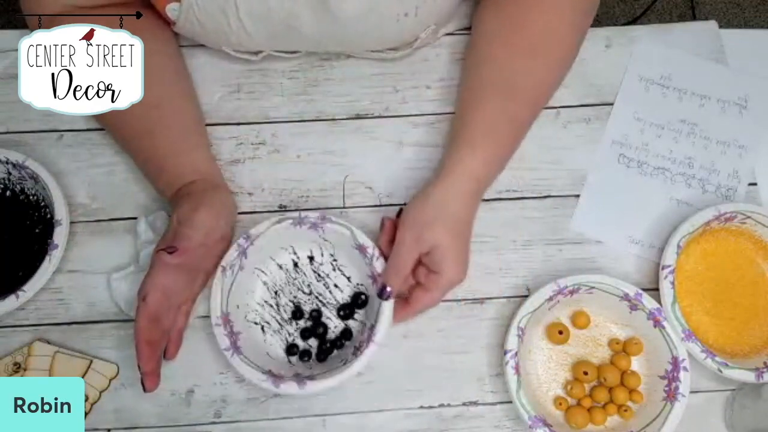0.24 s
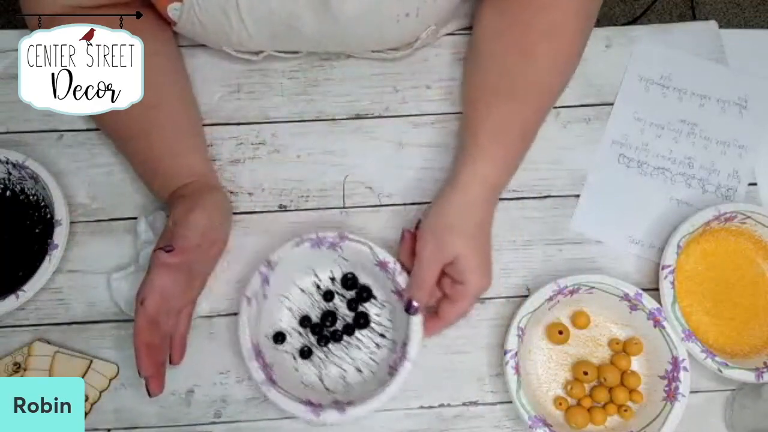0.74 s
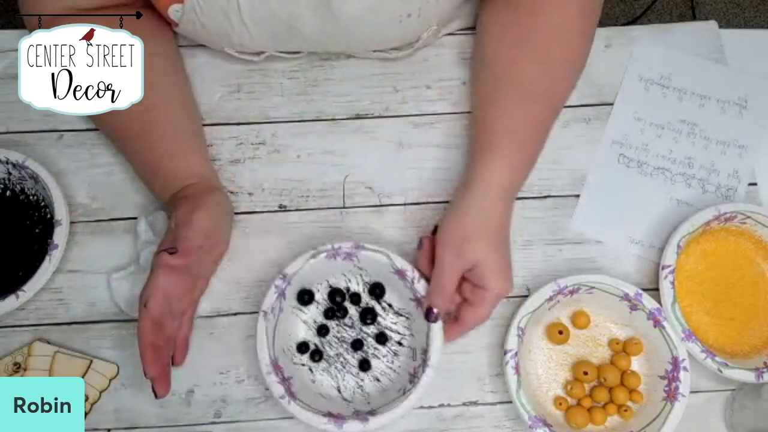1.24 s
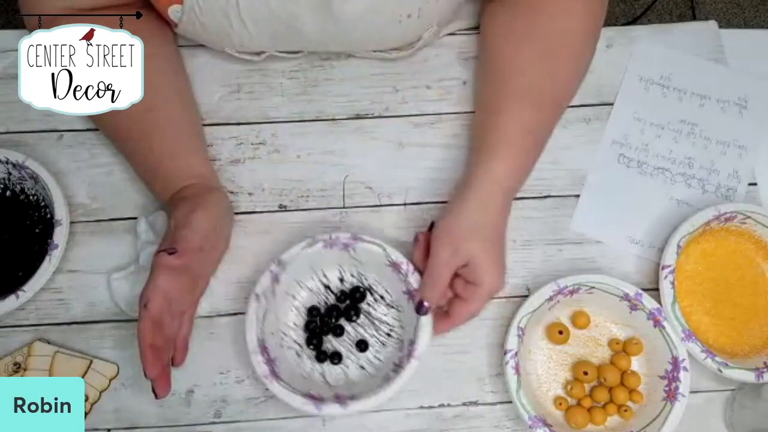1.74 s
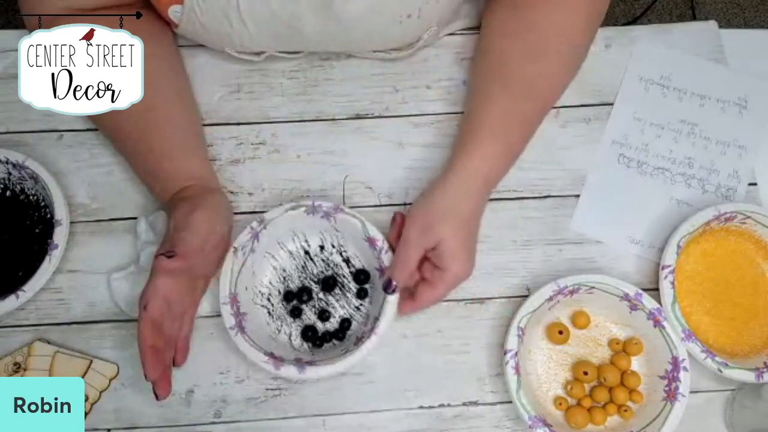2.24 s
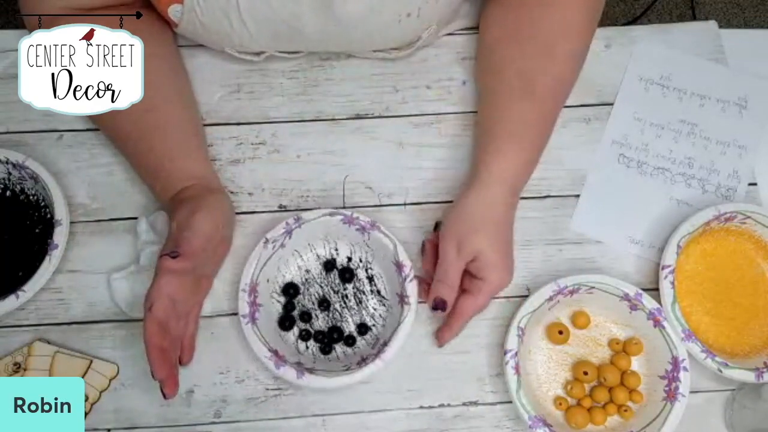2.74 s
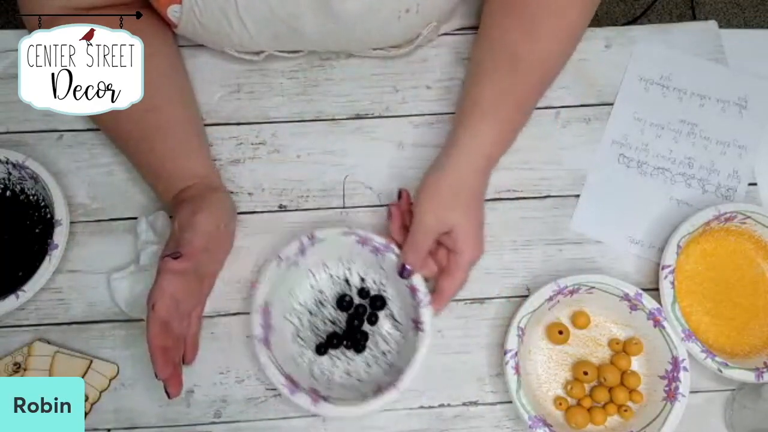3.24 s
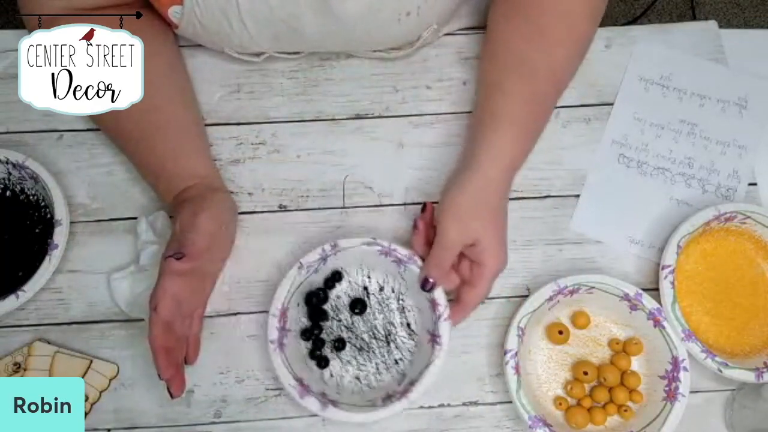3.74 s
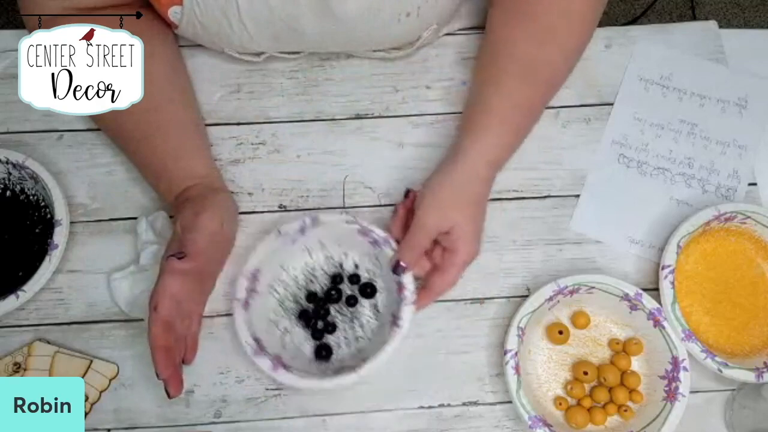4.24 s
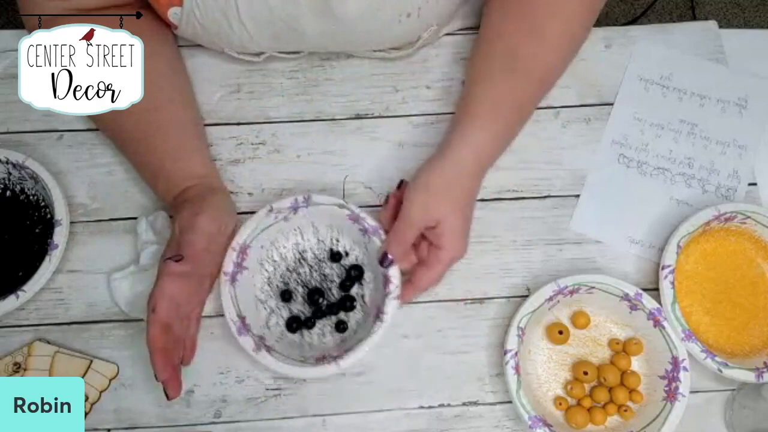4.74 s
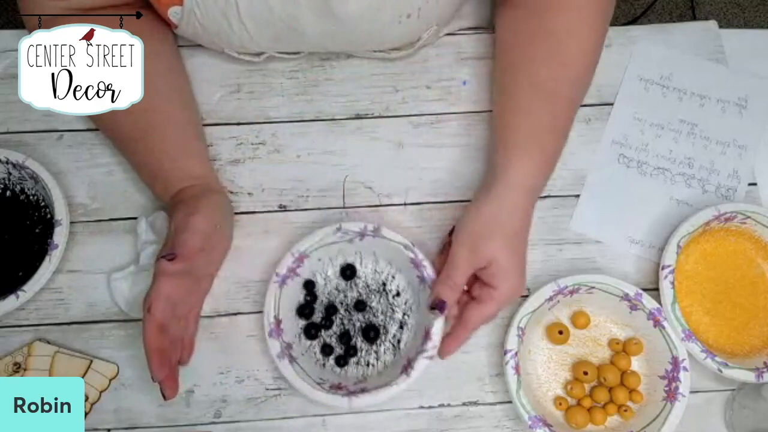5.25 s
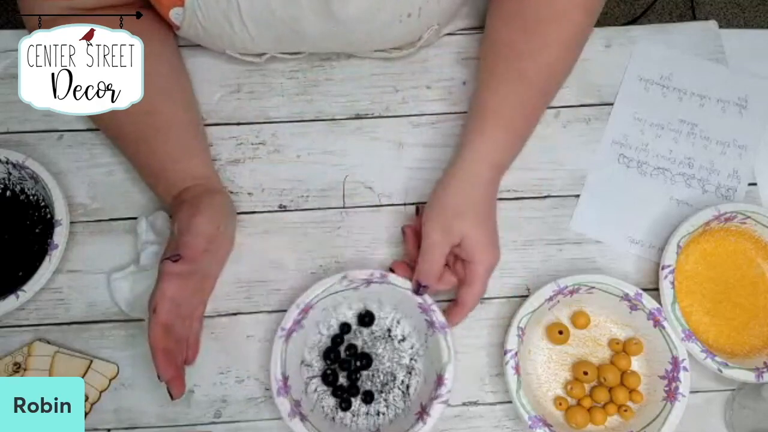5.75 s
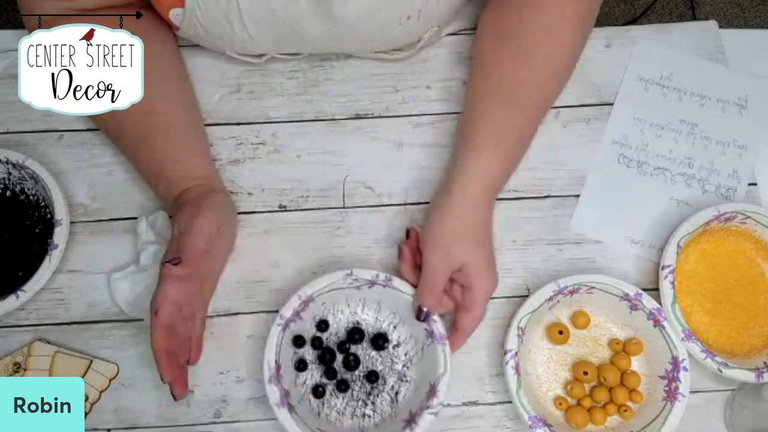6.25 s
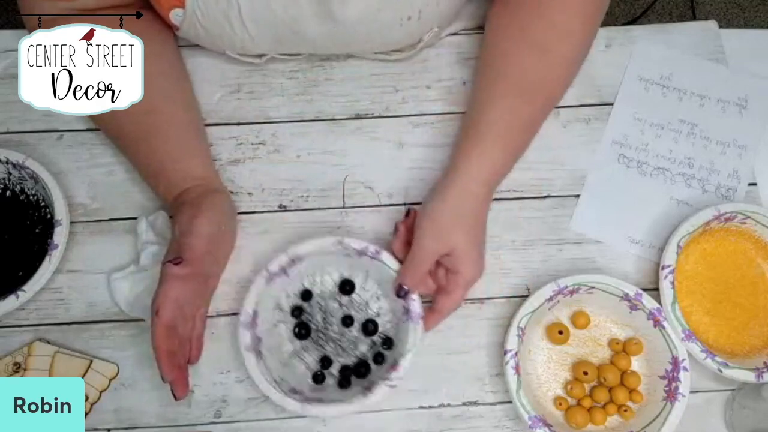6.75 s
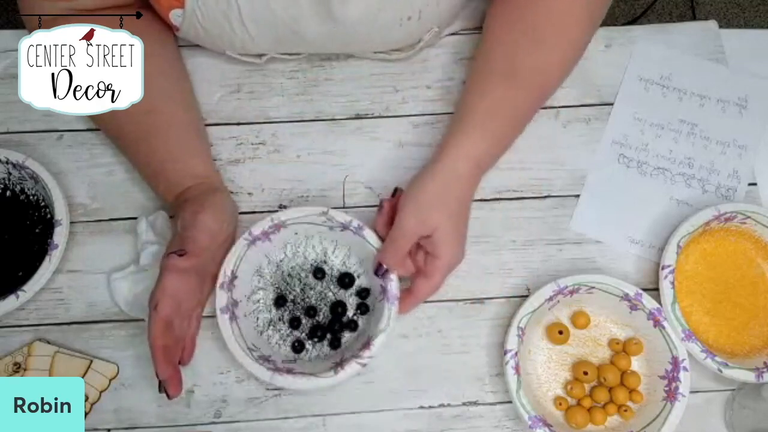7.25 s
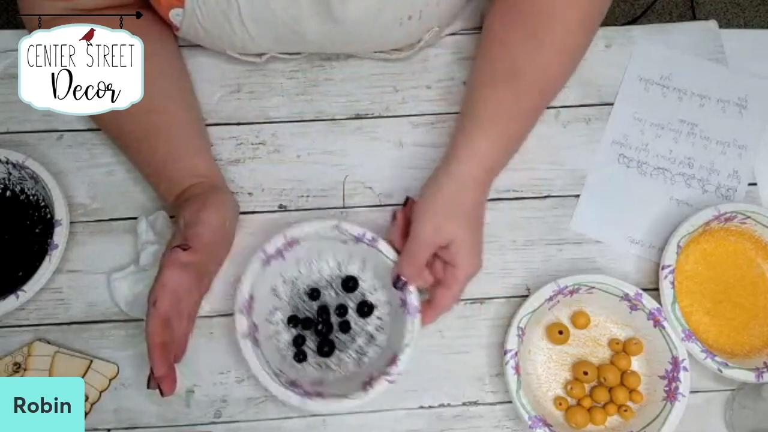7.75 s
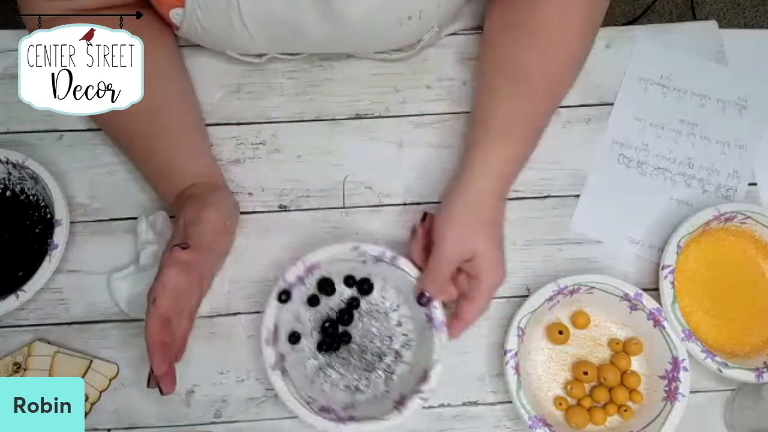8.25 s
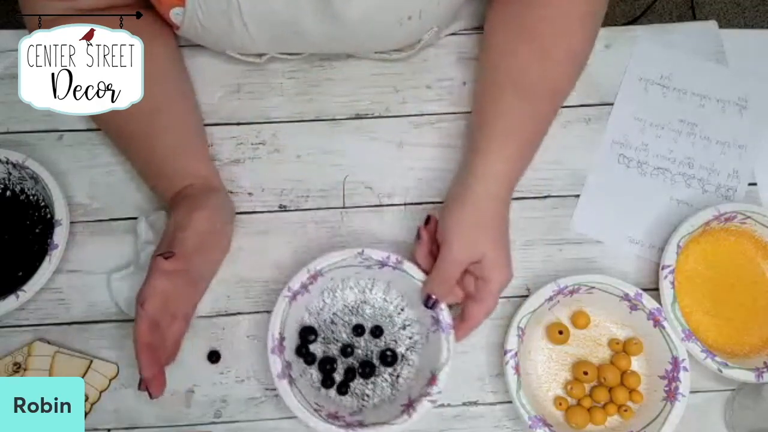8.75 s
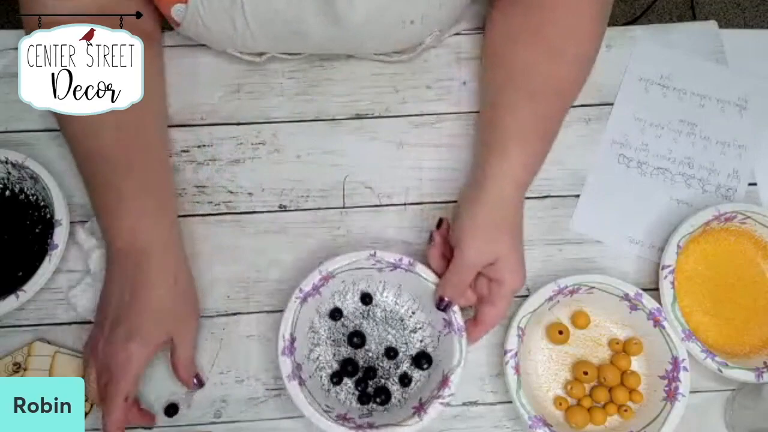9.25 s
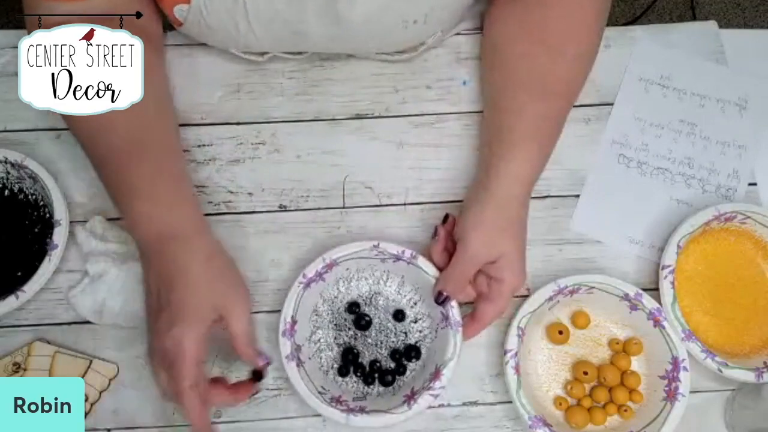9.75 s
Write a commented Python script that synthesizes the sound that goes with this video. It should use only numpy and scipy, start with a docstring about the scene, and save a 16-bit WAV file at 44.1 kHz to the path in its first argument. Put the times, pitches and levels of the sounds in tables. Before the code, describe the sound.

Small painted wooden beads roll and knock inside a powdered paper bowl, close to a single microphone in a small, dry room with a barely audible hush. From 0 to 0.9 s the rattle is bright and dense; lighter shakes follow, with sharper knocks near 1.5 s and a strong cluster around 1.9-2.2 s. It thins out and pauses at about 2.8 s. From 3.1 to 5.3 s the beads are shaken again, with firm clacks near 3.8 and 4.8 s. They almost rest until 6 s, with only faint ticks and soft low thumps of the bowl's bottom. Rolling resumes at 6.1 s, and from 7 to 8.6 s knocks crowd together, louder and duller, the hardest near 8.45 s. A few last clacks and a brief scrape end at about 9.2 s, leaving quiet.

```python
"""0-2.8 s: a dozen painted wooden beads, shaken in bursts in a powdered paper bowl on a craft table, roll
and scrape (dense ringing grains) and knock (rough force through a resonance); faint hush throughout.
From 0.8 s the bowl's bottom thumps softly now and then (juddering low sines).
3.1-5.3 s: shaken again, then near rest until about 6 s; the knocks crowd and grow louder and duller
at 7-8.6 s and end at 9.2 s. Bowl modes and a small room ring after the contacts; a single microphone hears it."""
import sys
import numpy as np
from scipy import signal
from scipy.fft import rfft, irfft
from scipy.io import wavfile
from scipy.ndimage import uniform_filter1d

SR = 44100
rng = np.random.default_rng(int(sys.argv[2]) if len(sys.argv) > 2 else 0)


def digitize_waveform(pressure):
    """Quantize a signal to 16-bit integers and store it at the path in sys.argv[1].

    Rows of a 2-D input are taken as channels; values are limited to [-1, 1].
    """
    field = np.atleast_2d(pressure).T
    bounded = np.clip(field, -1, 1)
    quanta = np.round(bounded * 32767).astype(np.int16)
    wavfile.write(sys.argv[1], SR, quanta)


N = 440559

# quiet background spectrum: (frequency [Hz], relative density [dB per Hz])
HUSH_SPECTRUM = [(20, 6), (200, -8.5), (600, -23.5), (15000, -33.5)]
# bowl kept moving, a few beads rolling:
# (start [s], length [s], level before bowl and room [dB], relative brightness [dB per octave])
SPELLS = [(0, 0.54, -41.5, 3), (0.59, 0.27, -45, 5), (1.049, 0.73, -47.5, 1.5), (1.85, 0.76, -48, 6.5),
          (3.111, 0.36, -44.5, 4.5), (3.532, 0.93, -43, 2.5), (4.53, 0.74, -43, 4.5),
          (5.858, 0.035, -59.0, 10), (6.102, 0.23, -45, 5), (6.372, 0.93, -40, 1.5), (7.37, 0.9, -44, 1.5),
          (8.334, 0.46, -46, 1), (8.922, 0.31, -43.5, -2)]
# shakes that send the whole heap across the paper:
# (start [s], length [s], level before bowl and room [dB], relative brightness [dB per octave])
SHAKES = [(0.038, 0.13, -31.5, 1.5), (0.269, 0.23, -31.0, -1.5), (0.592, 0.037, -35, 4),
          (0.943, 0.031, -31, 0), (1.049, 0.043, -31.5, 2.5), (1.174, 0.073, -32.5, 3),
          (1.271, 0.045, -32, 1.5), (1.409, 0.028, -33, 5), (1.486, 0.033, -30, 1.5),
          (1.623, 0.067, -34.5, 2.5), (1.744, 0.021, -29.0, 2.5), (1.851, 0.05, -26, 1),
          (1.937, 0.13, -34.5, -1.5), (2.186, 0.034, -27, 2.5), (2.255, 0.049, -34.5, 1.5),
          (3.197, 0.068, -34, 4.5), (3.553, 0.024, -31.5, -3.5), (3.618, 0.058, -35, 7.5),
          (3.777, 0.03, -32.5, 0.0), (3.896, 0.038, -24.5, 2), (3.987, 0.033, -23, -0.5),
          (4.089, 0.016, -32, -1.5), (4.17, 0.081, -37, 0), (4.309, 0.055, -35.5, 6),
          (4.519, 0.14, -32.0, -0.5), (4.854, 0.13, -34, 0.5), (5.155, 0.014, -31.0, 3.5),
          (6.183, 0.039, -37.5, 7), (6.276, 0.033, -34, -0.5), (6.389, 0.12, -34, 2.5),
          (6.525, 0.074, -28, 3.5), (6.638, 0.03, -28.5, 3.5), (6.726, 0.033, -32.5, 4),
          (6.828, 0.1, -35, -0.5), (6.932, 0.047, -26, -4), (7.019, 0.081, -27.0, -1.5),
          (7.191, 0.041, -30, 0), (7.28, 0.032, -27.5, -4), (7.374, 0.044, -21.0, -3),
          (7.667, 0.11, -28.5, -4.5), (7.847, 0.028, -24, -2.5), (7.947, 0.04, -23.5, 0),
          (8.042, 0.028, -30.5, -4.5), (8.12, 0.018, -34, 4.5), (8.163, 0.07, -25, 1.5),
          (8.381, 0.045, -27.5, -2), (8.636, 0.022, -32.5, 2.5), (8.954, 0.094, -34.5, 2),
          (9.124, 0.02, -27, -0.5)]
# colour of rolling: (frequency [Hz], relative gain [dB])
ROLL_COLOUR = [(30, -35), (90, -27.5), (130, -22.5), (290, -11.5), (600, 0.5), (1450, 1.5), (2050, -6),
               (3100, -6), (3800, -8.5), (4800, -18), (5800, -20), (7000, -28.5), (8500, -51.5),
               (15000, -70.5)]
# modes of the bowl: (frequency [Hz], resonance gain before the common ring_db [dB], t60 [s])
BOWL_MODES = [(348, 2.5, 0.056), (434.7, -0.5, .06), (640.6, -1, .08), (696, -20.5, 0.18), (926, -1, 0.091),
              (1023, -8, 0.038), (1290, -9.5, 0.057), (2331, 3, 0.02), (2590, -12, 0.081),
              (3130, -2, 0.026)]
# decay of the room: (frequency [Hz], t60 [s])
ROOM_T60 = [(200, 0.074), (8000, 0.069)]
# knocks that stand out of the rattle:
# (time [s], level before bowl and room [dB], ringing pitch [Hz], hardness as treble tilt [dB per octave])
KNOCKS = [(0.1953, -17, 2370, 6.5), (0.342, -19.5, 1900, 3.5), (0.3894, -21, 3120, 8),
          (0.422, -16.5, 2820, -2), (0.457, -18.5, 4130, -2), (0.4978, -21, 1840, -8),
          (0.5227, -22, 1720, -1.5), (0.584, -21.5, 5800, -2), (0.6129, -22.5, 1090, 2.5),
          (0.7544, -21, 3370, 0.5), (0.7939, -25.5, 3280, 7.5), (0.8513, -24.5, 3530, -1.5),
          (1.076, -25, 2180, -3), (1.1585, -26.5, 1720, 3), (1.1985, -25, 620, 3.5), (1.2367, -25, 3400, 2),
          (1.3197, -25, 640, -1), (1.477, -11.5, 795, 0.5), (1.5655, -23.5, 5600, -3),
          (1.6374, -26, 2950, -3), (1.664, -26, 3200, -3), (1.8666, -14.5, 1245, -1),
          (1.8975, -14.5, 1980, -2), (1.975, -19, 1290, 0.5), (2, -16.5, 2550, -4.5),
          (2.0481, -11.5, 1210, 5), (2.0915, -18.5, 1050, -3.5), (2.143, -29.5, 4960, 4),
          (2.1758, -20, 3090, 5), (2.19, -14, 3130, 3), (2.2, -21.5, 630, -6), (2.2203, -21.5, 640, -1),
          (2.2758, -21, 2760, 0.5), (2.4157, -26.5, 4080, 2), (2.457, -26.5, 2860, 4.5),
          (2.4996, -24, 3140, 1), (2.6153, -29.5, 3870, 1), (2.6963, -31.5, 4020, -1.5),
          (2.7835, -34, 1990, 2), (3.1266, -32.5, 910, 1), (3.2145, -32, 650, 8.5),
          (3.2577, -24.5, 1030, 2.5), (3.3454, -29.5, 655, 12.5), (3.3846, -26, 3200, 9),
          (3.5638, -29.5, 650, -1), (3.701, -15, 925, 2), (3.809, -11.5, 1270, -1.5),
          (3.933, -22.5, 3740, 7.5), (3.9456, -18, 1800, 4.5), (3.9842, -20, 5800, -1.5),
          (4.0502, -20, 1360, 1), (4.0851, -23.5, 1920, 0), (4.143, -26.5, 1700, -1.5),
          (4.1724, -28.5, 3300, 2), (4.2519, -28, 2840, -0.5), (4.2053, -22, 1370, -2.5),
          (4.3433, -21.5, 5000, -3), (4.4367, -23.5, 3660, -1.5), (4.5387, -22, 2970, 0),
          (4.578, -16, 1270, 6.5), (4.6322, -21, 1700, 2), (4.7716, -13, 980, 5.5), (4.8627, -25, 695, 2),
          (4.9072, -19, 627, 2.5), (4.961, -22, 800, -4.5), (5.0757, -19.5, 1530, -1),
          (5.1438, -24, 1050, -6), (5.1596, -17.5, 3220, -2.5), (5.1966, -24, 1680, 1.5),
          (5.257, -22, 1030, -4.5), (5.3634, -36, 2860, -1), (5.546, -65, 5900, 11),
          (5.742, -50.5, 1255, 12.5), (5.796, -51, 880, 3), (6.087, -27.5, 1210, 2),
          (6.2699, -28.5, 2470, -0.5), (6.53, -18.5, 4300, -1.5), (6.7275, -21, 3180, -0.5),
          (6.839, -26.5, 3160, 1), (6.9453, -20, 920, 6), (7.0806, -11.5, 1070, 2),
          (7.1595, -22.5, 1320, -0.5), (7.196, -17, 2400, -0.5), (7.2073, -9.5, 2610, 0),
          (7.2903, -12.5, 1630, 6.5), (7.4074, -11.5, 1070, -0.5), (7.529, -14.5, 3500, -3),
          (7.5896, -16.5, 1680, -7), (7.638, -12, 1660, -4), (7.69, -15.5, 1380, -8),
          (7.7407, -11, 3440, -1), (7.758, -15, 1880, -0.5), (7.8209, -20, 1860, -0.5),
          (7.8589, -16, 1930, -5), (7.9445, -18, 2890, 0.5), (8.047, -13, 1740, -2),
          (8.0756, -15.5, 1230, -1), (8.195, -11, 3720, -1.5), (8.27, -17.5, 1350, -5),
          (8.3293, -10.5, 1340, -0.5), (8.3382, -17.5, 1310, -2), (8.3875, -18, 1040, -5),
          (8.4505, -7, 1590, 1.5), (8.5353, -13, 2120, -3.5), (8.575, -26, 3800, -1),
          (8.7265, -16, 1340, 5.5), (8.843, -50.5, 1080, -10.5), (9.0013, -24, 6030, 2),
          (9.1737, -24.5, 1340, -4), (9.2298, -20.5, 1235, -3)]
# colour of a knock: (frequency [Hz], relative gain [dB])
KNOCK_COLOUR = [(30, -43), (100, -33.5), (270, -26), (450, -6.5), (650, -2), (1060, -2), (1450, 7.5),
                (2050, -8), (2600, -3), (3400, -8.5), (4700, -21.5), (5900, -20.5), (7000, -36),
                (8500, -71)]
# bowl bottom flexing against the table: (time [s], swell peak [dB], mean pitch [Hz], rise time [s])
THUMPS = [(0.841, -58, 149, 0.0061), (2.283, -43.5, 214, 0.013), (3.12, -49.5, 186, 0.017),
          (3.332, -49, 226, 0.031), (3.637, -43, 192, 0.018), (4.099, -49, 190, 0.014),
          (4.597, -40, 304, 0.019), (4.861, -45, 204, 0.019), (4.956, -43.5, 206, 0.013),
          (5.469, -41, 208, 0.0086), (5.543, -57, 189, 0.01), (5.852, -42.5, 220, 0.014),
          (6.076, -50, 182, 0.026), (6.737, -35, 320, 0.011), (8.636, -35, 195, 0.011)]

HUSH_RMS_DB = -82
BAND_LIMIT_HZ = 15500
KERNEL_SAMPLES = 2048
KERNEL_HZ = np.fft.rfftfreq(KERNEL_SAMPLES, 1 / SR)
KERNEL_T_S = np.arange(KERNEL_SAMPLES) / SR
TRAVEL_S = .004  # mean travel time of the bending waves
TILT_PIVOT_HZ = 1500
START_DB_PER_S, SETTLE_DB_PER_S = 1299.5, 749.5
# beads jostled by a knock: level against the knock, delay, length
JOSTLE_DB, JOSTLE_AFTER_S, JOSTLE_S = -15.5, .004, .005
# candidate light taps: rate, level against the rolling, scatter to either side
TAPS_PER_S, TAP_DB, TAP_SPREAD_DB = 20, 4, 1.5


def gain_of(db):
    """Decibels to amplitude."""
    return 10 ** (np.asarray(db) / 20)


def evened(x):
    """Scales to rms 1."""
    return x / np.sqrt(np.mean(x ** 2, axis=-1, keepdims=True) + 1e-20)


def read(points, hz):
    """Reads a table along a log-frequency axis."""
    point_hz, value = np.transpose(points)
    return np.interp(np.log(hz + 1), np.log(point_hz + 1), value)


def add(mix, start_s, sound):
    """Mixes a sound in at start_s."""
    part = mix[max(round(start_s * SR), 0):][:len(sound)]
    part += sound[:len(part)]


def causal(db):
    """Minimum-phase responses with these gains: they ring only after the blow."""
    log_gain = np.log(gain_of(np.concatenate([db, db[:, -2:0:-1]], axis=1)))
    return np.exp(np.conj(signal.hilbert(log_gain, axis=1)))[:, :len(KERNEL_HZ)]


def ring(hz, sharpness, lift_db):
    """Resonance of the struck spot, as a bump in dB."""
    ratio = (KERNEL_HZ + 1) / hz
    return 10 * np.log10(1 + gain_of(lift_db) ** 2 / (1 + (sharpness * (ratio - 1 / ratio)) ** 2))


def ripple(count, width_hz):
    """Smooth, bounded random curves over frequency: every spot of the bowl answers in its own way."""
    lag = np.fft.rfftfreq(KERNEL_SAMPLES, SR / KERNEL_SAMPLES)
    reach = np.exp(-.5 * (lag * width_hz) ** 2)
    curves = evened(irfft(rfft(rng.standard_normal((count, KERNEL_SAMPLES))) * reach))
    return evened(np.tanh(curves))[:, :len(KERNEL_HZ)]


def contact(db, uneven_db, uneven_hz, smear_s, smear_hz):
    """Responses of struck spots: uneven peaks, and bending waves that reach the air at unequal times."""
    delay_s = TRAVEL_S + smear_s * ripple(len(db), smear_hz)
    dispersion = np.exp(-2j * np.pi * np.cumsum(delay_s, axis=1) * SR / KERNEL_SAMPLES)
    uneven = causal(db + uneven_db * ripple(len(db), uneven_hz))
    return irfft(uneven * dispersion) * signal.windows.tukey(KERNEL_SAMPLES, .1)


def hush():
    """Very faint steady background: noise shaped by its spectrum."""
    spectrum = rfft(rng.standard_normal(N)) * gain_of(read(HUSH_SPECTRUM, np.fft.rfftfreq(N, 1 / SR)))
    return gain_of(HUSH_RMS_DB) * evened(irfft(spectrum, N))


def motion():
    """Level and brightness of the moving beads: pushes start, hold and settle; the strongest leads."""
    t = np.arange(0, N / SR, .001)
    jostles = [(s + JOSTLE_AFTER_S, JOSTLE_S, db + JOSTLE_DB, hardness) for s, db, hz, hardness in KNOCKS]
    start, length, db, brightness = np.vstack([SPELLS, SHAKES, jostles]).T[:, :, None]
    rise_db = START_DB_PER_S * np.maximum(start - t, 0)
    settle_db = SETTLE_DB_PER_S * np.maximum(t - start - length, 0)
    pushes_db = db - rise_db - settle_db
    leading_brightness = brightness[pushes_db.argmax(axis=0), 0]
    sample_s = np.arange(N) / SR
    return [np.interp(sample_s, t, curve) for curve in (pushes_db.max(axis=0), leading_brightness)]


def rolling(motion_db, brightness, count=56, grains_per_s=1500, spread_db=5.5, clump_db=4,
            clump_s=0.0076, tilt_db=-1.0):
    """Rough beads tumble over powdered paper: clumps of tiny contacts, each with its own ring."""
    hz = np.geomspace(550, 6000, count)[:, None]
    colour = read(ROLL_COLOUR, KERNEL_HZ) + ring(hz, sharpness=10, lift_db=17)
    grains = contact(colour, uneven_db=4.5, uneven_hz=460, smear_s=0.001147, smear_hz=1620)
    size = gain_of(spread_db * np.minimum(rng.exponential(1, N), 4)) * rng.choice([-1, 1], N)
    # a bead chatters on one spot for about 9 ms; half the touches fall anywhere
    spot = np.repeat(rng.integers(0, count, N // 400 + 1), 400)[:N]
    spot = np.where(rng.random(N) < .5, spot, rng.integers(0, count, N))
    clumps = evened(uniform_filter1d(rng.standard_normal(N), max(round(clump_s * SR), 2)))
    # high-ringing spots lead in a bright shake, low-ringing in a dull one
    tilt = (brightness + tilt_db) * np.log2(hz[spot, 0] / TILT_PIVOT_HZ)
    size *= gain_of(clump_db * clumps + tilt)
    out = np.zeros(N)
    for i in np.flatnonzero(rng.random(N) < grains_per_s / SR):
        add(out, i / SR, size[i] * grains[spot[i]])
    power = uniform_filter1d(out ** 2, size=1400)
    moving = np.clip((motion_db + 84) / 10, 0, 1)  # beads at rest are silent
    return moving * gain_of(motion_db) * out / np.sqrt(abs(power) + 1e-12)


def bowl(x, ring_db=-3):
    """The bowl's modes ring on after every contact: decaying cosines."""
    t = np.arange(SR // 5) / SR
    modes = np.zeros(len(t))
    for hz, db, t60_s in BOWL_MODES:
        unit_peak = 2 * np.log(1000) / (t60_s * SR)  # gain 1 at resonance
        modes += unit_peak * gain_of(db - 60 * t / t60_s) * np.cos(2 * np.pi * hz * t)
    return x + gain_of(ring_db) * signal.oaconvolve(x, modes)[:N]


def room(x, wet_db=-13, echo_s=.0067, echo_db=-11):
    """One near reflection and a short diffuse tail of decaying noise."""
    hz, t, z = signal.stft(rng.standard_normal(SR // 3), SR, nperseg=256)
    decay = gain_of(-60 * t / read(ROOM_T60, hz)[:, None])
    tail = signal.istft(z * decay, SR, nperseg=256)[1]
    tail *= 1 - np.exp(-(np.arange(len(tail)) / SR / 0.0065) ** 2)  # gradual onset
    tail *= gain_of(wet_db) / np.linalg.norm(tail)
    add(tail, echo_s, gain_of([echo_db]))
    return x + signal.oaconvolve(x, tail)[:N]


def light_taps(motion_db, brightness, low_hz=600, high_hz=6000, hardness_spread_db=3):
    """Chance meetings of beads, strength and brightness following the heap; rows as in KNOCKS."""
    when, strength, pitch, hard = rng.random((round(TAPS_PER_S * N / SR), 4)).T
    at = (when * N).astype(int)
    db = motion_db[at] + TAP_DB + TAP_SPREAD_DB * (2 * strength - 1)
    hardness = brightness[at] + hardness_spread_db * (2 * hard - 1)
    rows = np.column_stack([at / SR, db, low_hz * (high_hz / low_hz) ** pitch, hardness])
    return rows[db > -60]


def knocks(rows, shiver_db=-3.0, shiver_s=0.0026, scrape_db=-8, scrape_s=0.0032, firmness=0.085,
           firm_db=-21, rebound_db=-7, rebound_s=0.015):
    """A bead scrapes up the wall, hits, chatters on the paper, and rebounds twice."""
    s, db, hz, hardness = np.transpose(rows)[:, :, None]
    octaves = np.log2(np.clip(KERNEL_HZ, 550, 6500) / TILT_PIVOT_HZ)
    colour = read(KNOCK_COLOUR, KERNEL_HZ) + ring(hz, sharpness=6, lift_db=14.5) + hardness * octaves
    spot = contact(colour, uneven_db=3.5, uneven_hz=630, smear_s=0.00059, smear_hz=1490)
    # force: one sharp push between a rough lead-in and a rough after-shake
    blow_s = KERNEL_SAMPLES / 2 / SR
    t = KERNEL_T_S - blow_s
    scrape = gain_of(scrape_db) * np.exp(-abs(t) / scrape_s) / np.sqrt(scrape_s)
    shiver = gain_of(shiver_db) * np.exp(-abs(t) / shiver_s) / np.sqrt(shiver_s)
    noise = rng.standard_normal((len(s), KERNEL_SAMPLES)) * np.sqrt(2 / SR)
    rough = noise * np.where(t < 0, scrape, shiver)
    # weak, glancing touches are rougher; head-on hits are mostly push
    force = rough * gain_of(-firmness * (db - firm_db)) + signal.unit_impulse(KERNEL_SAMPLES, "mid")
    clacks = signal.fftconvolve(force, spot, axes=1)
    # level = rms of the 6 ms around the blow's arrival
    heart = abs(np.arange(clacks.shape[1]) / SR - TRAVEL_S - blow_s - .002) < .003
    clacks *= gain_of(db) / np.sqrt(np.mean(clacks[:, heart] ** 2, axis=1, keepdims=True))
    out = np.zeros(N)
    for start_s, clack in zip(s[:, 0] - TRAVEL_S - blow_s, clacks):
        add(out, start_s, clack)
        for after, size in rng.random((2, 2)):
            rebound = -gain_of(rebound_db) * size * (1 - after / 2) * clack
            add(out, start_s + rebound_s * (after + 0.14), rebound)
    return out


def thumps(judder=0.22):
    """The bowl's bottom catches on the table and judders: short, damped, unsteady low pushes."""
    t = np.arange(SR // 5) / SR
    out = np.zeros(N)
    for s, db, hz, rise_s in THUMPS:
        swell = (t / rise_s * np.exp(1 - t / rise_s)) ** 2
        grip = evened(uniform_filter1d(rng.standard_normal(len(t)), size=200))
        phase = 2 * np.pi * hz * np.cumsum(1 + judder * grip) / SR
        add(out, s, gain_of(db) * swell * np.sin(phase))
    return out


def scene():
    """Beads in the bowl, in the room; the same in both channels."""
    motion_db, brightness = motion()
    taps = knocks(light_taps(motion_db, brightness))
    contacts = rolling(motion_db, brightness) + taps + knocks(KNOCKS)
    sound = room(gain_of(-3.0) * bowl(contacts)) + thumps() + hush()
    return np.array([sound, sound])


def record(dry):
    """Clips at full scale, then limits the band."""
    clipped = np.clip(dry, -1, 1)
    lowpass = signal.firwin(255, BAND_LIMIT_HZ, window=("kaiser", 9), fs=SR)
    return signal.oaconvolve(clipped, lowpass[None], "same")


dry = scene()
out = record(dry)
digitize_waveform(out)
```